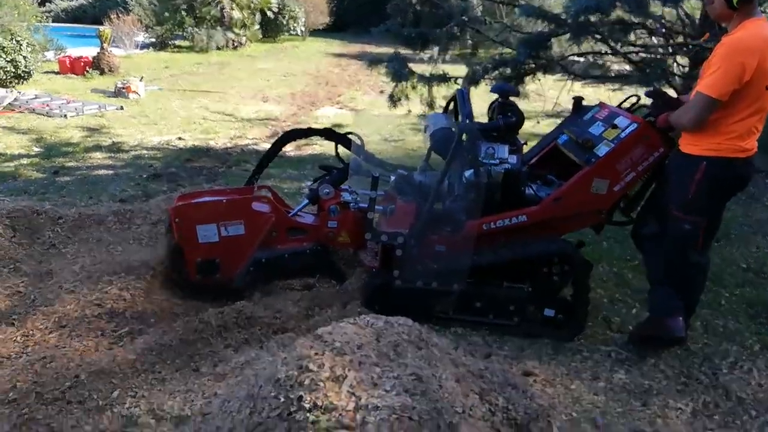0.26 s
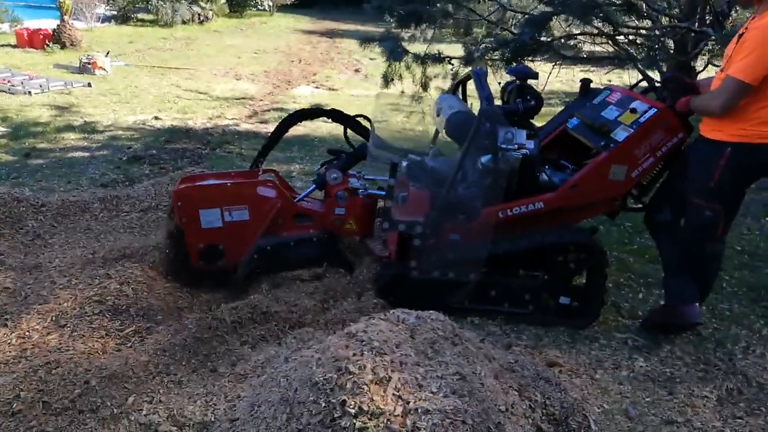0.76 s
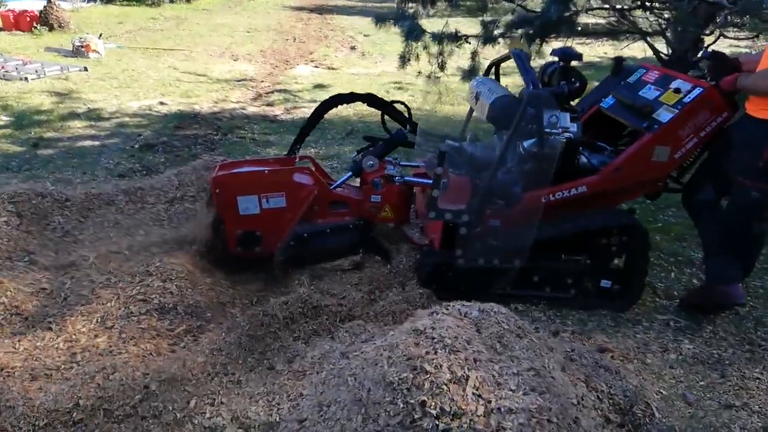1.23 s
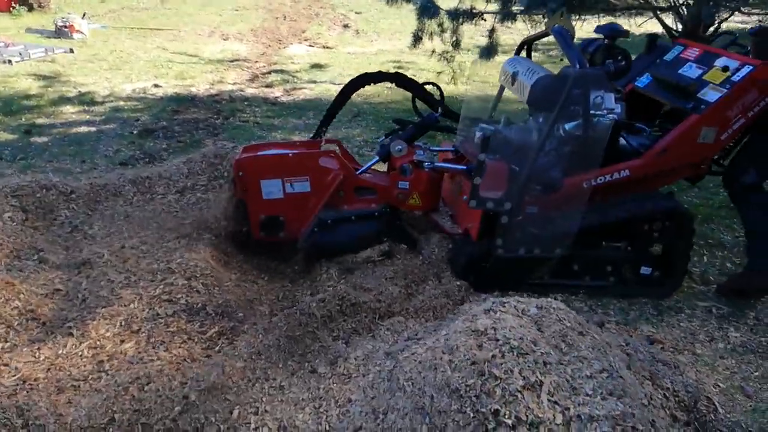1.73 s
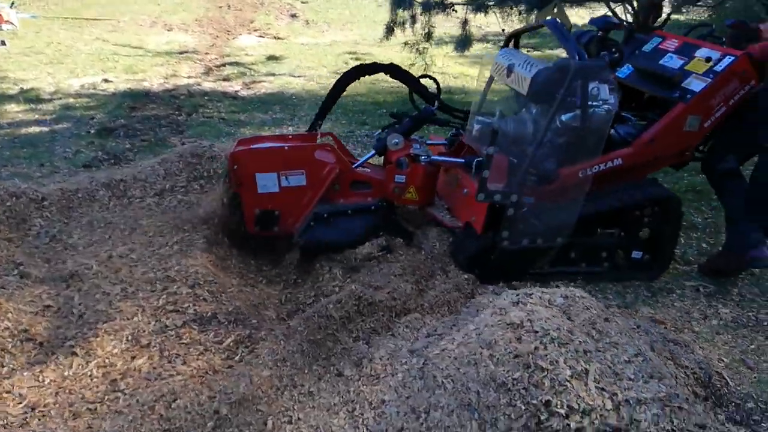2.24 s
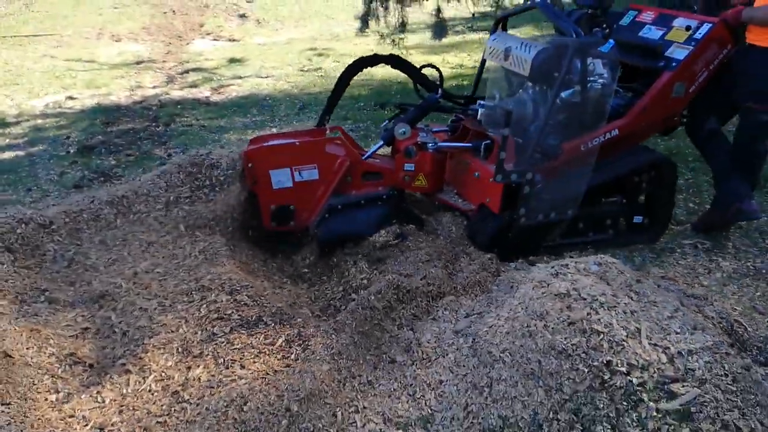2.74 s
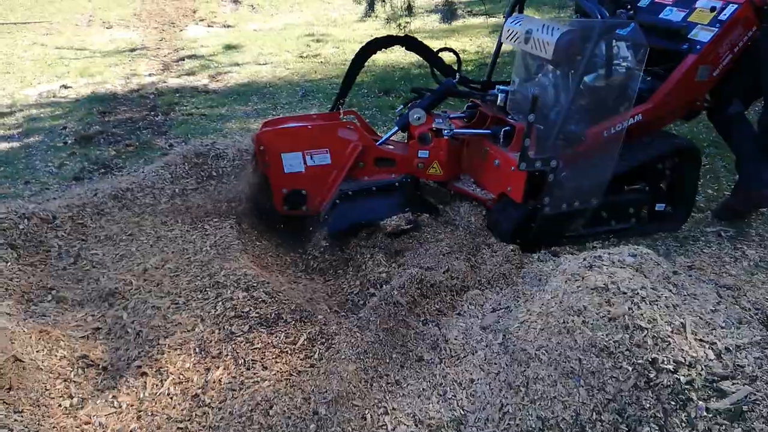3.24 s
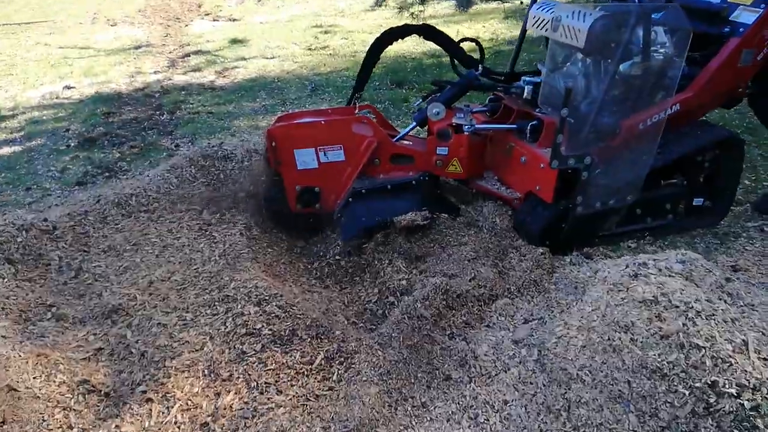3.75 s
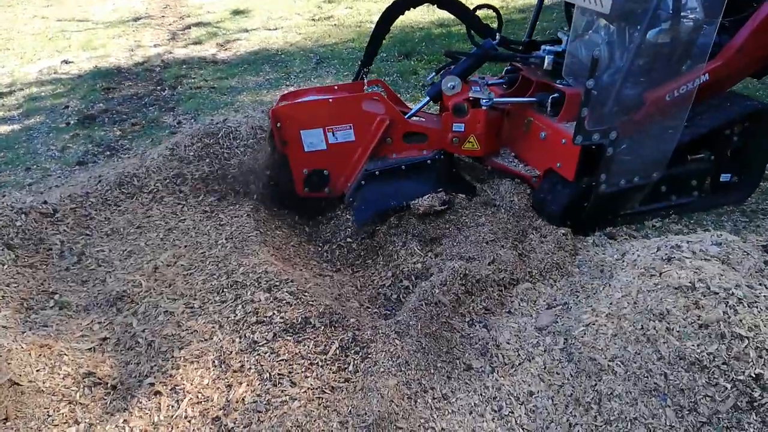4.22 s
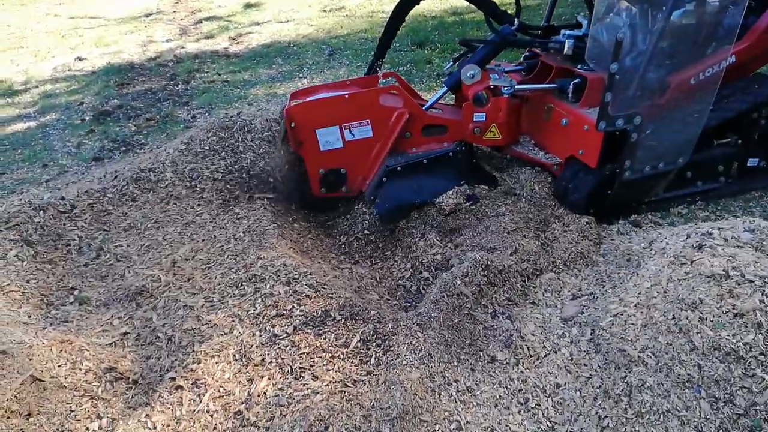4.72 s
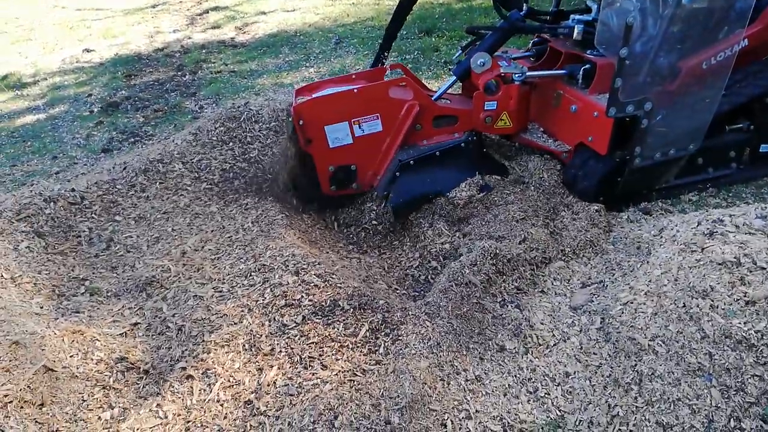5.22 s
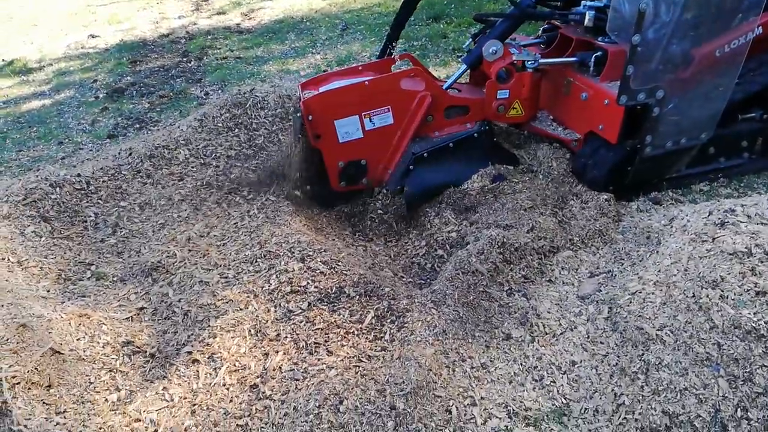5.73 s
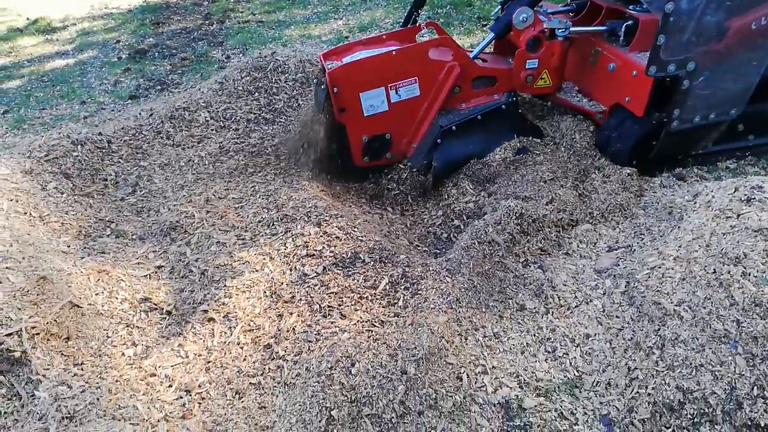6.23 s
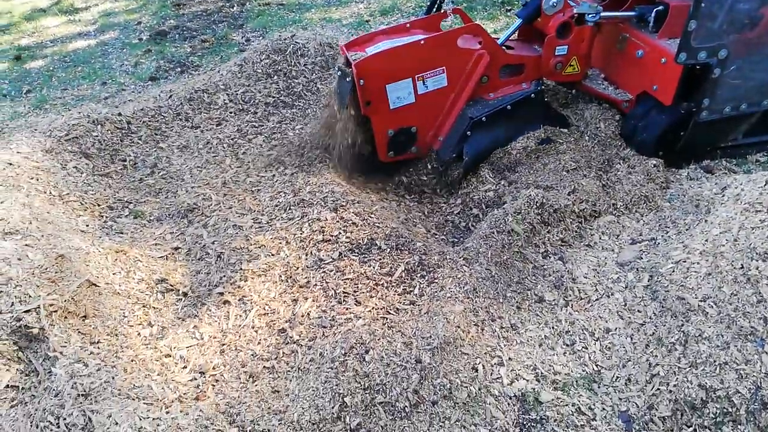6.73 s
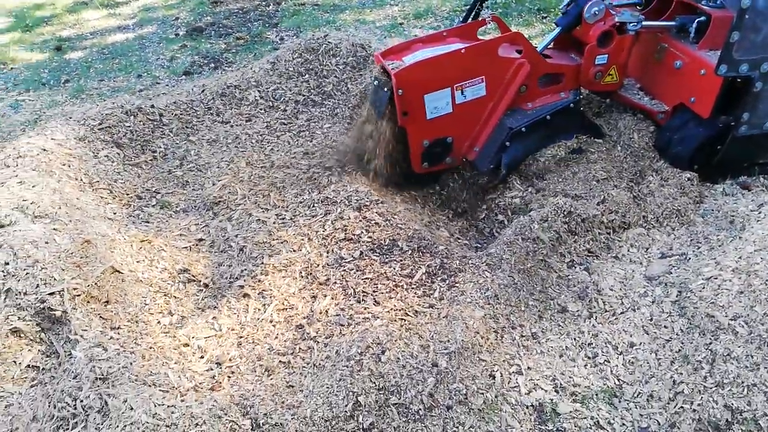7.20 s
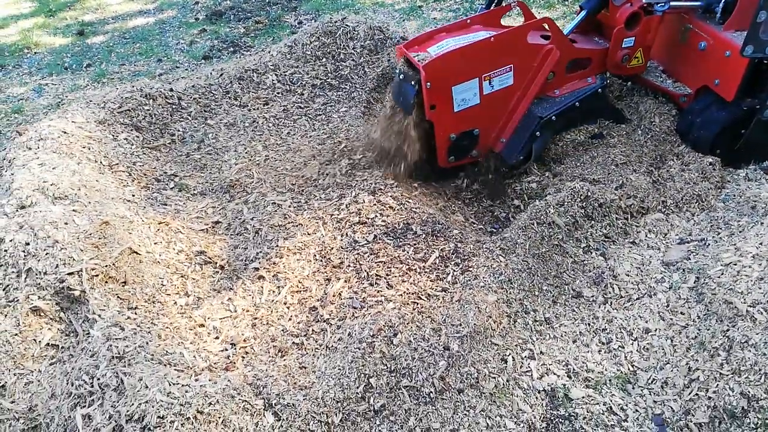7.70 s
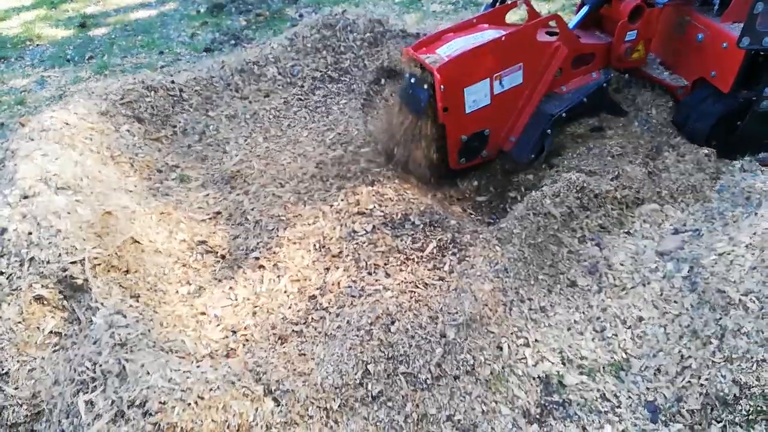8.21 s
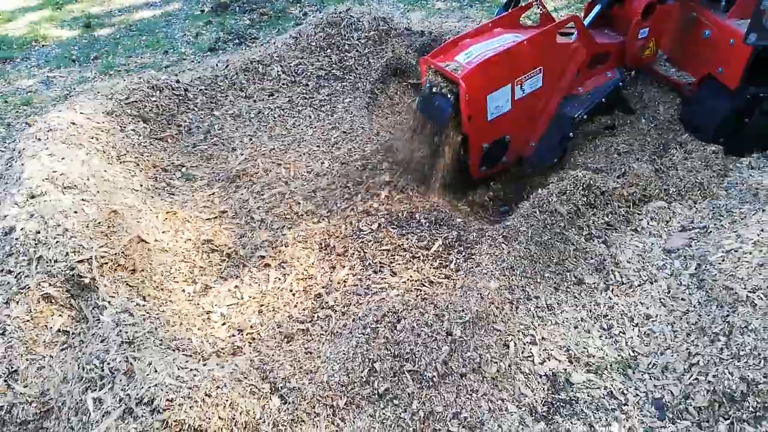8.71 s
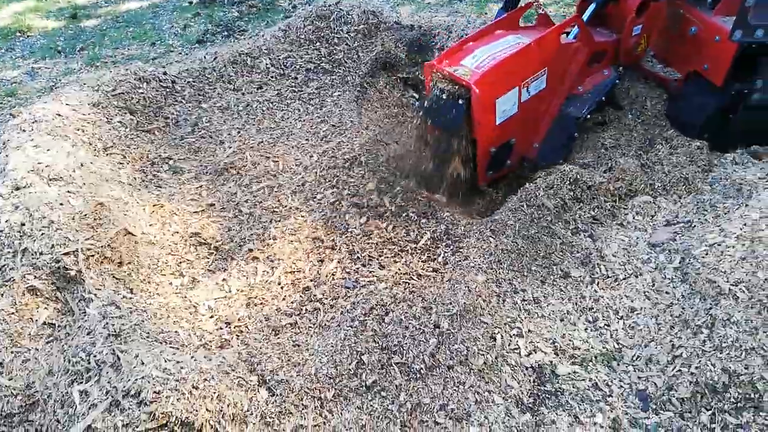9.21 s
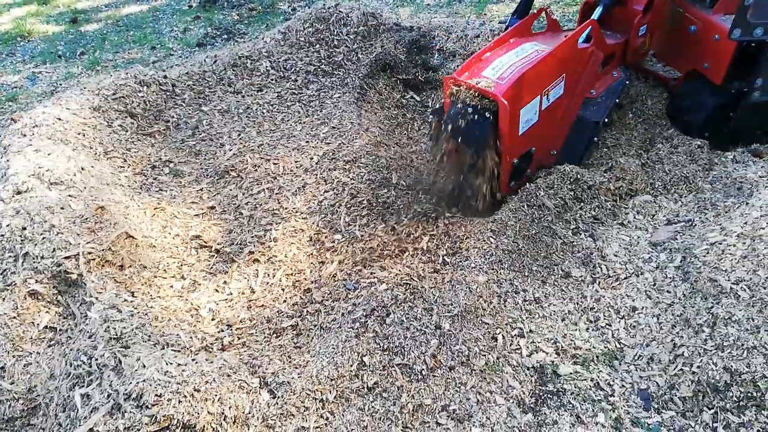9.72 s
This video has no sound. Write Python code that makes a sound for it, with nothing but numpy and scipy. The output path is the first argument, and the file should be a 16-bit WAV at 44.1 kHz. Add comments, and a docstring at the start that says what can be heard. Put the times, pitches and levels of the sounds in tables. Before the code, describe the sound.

A small petrol engine throbs steadily at high revs while a toothed wheel rasps wood into hissing chips, with sharp knocks and brief metallic pings.

```python
"""First one hears the throb of a V-twin petrol engine, while a stump grinder's teeth skim loose wood on a lawn.
A periodic line spectrum makes the exhaust, whose throttle follows a governor that hunts as the speed changes.
Filtered noise makes the rasp of the teeth, the splintering and the chips that hiss against the guard;
decaying bursts and tones make the hard knocks, and damped or sustained modes the ringing steel wheel.
The listener walks from beside the machine to the cutter, so the colours and the balance change."""
import sys
import numpy as np
from scipy import signal
from scipy.fft import rfft, irfft, next_fast_len
from scipy.io import wavfile
from scipy.ndimage import uniform_filter1d

SR = 44100
rng = np.random.default_rng(int(sys.argv[2]) if len(sys.argv) > 2 else 0)


def bounce(signal):
    """Save signal as a 16-bit WAV file at the path given by the first command-line argument."""
    frames = np.transpose(np.atleast_2d(signal))
    limited = np.clip(frames, -1, 1)
    pcm = np.round(limited * 32767).astype(np.int16)
    wavfile.write(sys.argv[1], SR, pcm)


N = 438794
TIME = np.arange(N) / SR
FREQS = np.maximum(np.fft.rfftfreq(next_fast_len(N), 1 / SR), 1)

# walk towards the cutter: (time [s], place [0 far, 1 halfway, 2 near])
WALK = [(0, 0.21), (2.4, 0.087), (4.4, 0.88), (6.9, 1.7), (9.95, 2.03)]
LEFT_LAG_S = 0.00046  # low sounds reach the right side first

# crankshaft speed: (time [s], speed [rpm])
CRANK_SPEED = [(0.0, 3505), (0.88, 3493), (2.21, 3528), (2.75, 3465), (3.09, 3509), (3.81, 3354),
               (4.06, 3603), (4.44, 3485), (5.14, 3494), (5.41, 3426), (5.67, 3560), (6.4, 3371),
               (7.33, 3490), (7.88, 3433), (8.0, 3495), (8.78, 3421), (9.3, 3531), (9.95, 3475)]
# firing moments of the two cylinders: (first [share of a cycle], second [share of a cycle])
FIRINGS = (.487, .858)
WEAK_PUFF_DB = -3.5  # first puff of a cycle beside the second
# silencer resonances: (frequency [Hz], width [Hz])
SILENCER_MODES = [(68, 32), (160, 83)]
# exhaust lines beside the engine, relative within each voice: (multiple of the cycle rate, level [dB])
EXHAUST_FAR = [(1, -17), (2, -2), (3, -3), (4, -11), (5, 2.5), (6, 1.5), (7, -14), (8, -7.5), (9, -6),
               (10, -7.5), (11, -12), (12, -12), (13, -16.5), (14, -21), (15, -53), (16, -23)]
# exhaust lines close to the cutter, relative within each voice: (multiple of the cycle rate, level [dB])
EXHAUST_NEAR = [(1, -15), (2, -1), (3, 0), (4, -12), (5, 0.5), (6, 2), (7, -15.5), (8, -8.5), (9, -17),
                (10, -23.5), (11, -45.5), (12, -49), (13, -34), (14, -19.5), (15, -53), (16, -18)]
# throb, boom, bark and rasp of the exhaust:
# (level at light load [dB], added at full throttle [dB], added per place walked [dB])
EXHAUST_VOICES = [(-27.5, 3, 0.6), (-27.5, 6.5, 1.2), (-19.9, -3, -0.2), (-33, -2.5, 2)]
# brief dips of the exhaust's level: (time [s], length [s], depth [dB])
EXHAUST_DIPS = [(2.65, 0.19, 4), (2.92, 0.26, 6.5), (3.3, 0.42, 1.5), (5.1, 0.081, 3.5), (7.74, 0.079, 3),
                (7.922, 0.59, 2.5), (9.248, 0.2, 2)]
DIP_ATTACK_S, DIP_RELEASE_S = 0.044, 0.1
# moments when the exhaust turns raspier: (time [s], length [s], added level [dB])
EXHAUST_FLARES = [(1.55, 0.71, 3.3), (5.45, 0.38, 0.5)]
FLARE_RAMP_S = 0.29
# speed at half throttle, scale of the response to sag, reaction lag, and span over which the throttle is smoothed
GOVERNOR_RPM, GOVERNOR_SPAN_RPM, GOVERNOR_LAG_S, GOVERNOR_TRAVEL_S = 3456, 24.2, 0.12, 0.38

# whines of fan and valve gear, before wavering and panning:
# (multiple of the cycle rate, level at the far place [dB], level from halfway on [dB])
WHINES = [(24, -37, -38), (26, -37, -41), (28, -43, -47), (30, -43, -47), (32, -42, -43), (36, -42, -43),
          (40, -44, -43), (48, -42, -41)]
# the fan's blade note, the lowest whine, is strongest where the walk passes its intake
FAN_PLACE, FAN_WIDTH_PLACES, FAN_GAIN_DB, FAN_AWAY_DB = 0.78, 0.28, 9, -1.5

BELT_RATIO = 1.226  # turns of the wheel per engine cycle, before slip
# modes of wheel and guard, relative: (frequency [Hz], level [dB], decay by 60 dB [s])
WHEEL_MODES = [(1170, 10, 0.12), (1660, 15, .05), (1830, 3.5, 0.19), (1990, 11, 0.14), (2310, 15, 0.052)]
# rubs that make one wheel mode sing, before wavering and panning:
# (time [s], length [s], level [dB], frequency [Hz])
RUBS = [(1.58, 0.62, -39.5, 2000), (3.476, 0.06, -27.5, 2005), (6.195, 0.11, -29.5, 1856),
        (6.399, 0.1, -29.5, 1844), (6.56, 0.42, -36.5, 1856), (7.065, 0.09, -26.5, 1856),
        (7.3, 0.36, -34.5, 1841), (7.95, 0.2, -34.5, 1870), (8.593, 0.21, -28, 1853),
        (8.886, 0.088, -35, 1865), (9.102, 0.39, -36, 1850), (9.576, 0.1, -30, 1856),
        (9.808, 0.1, -30.5, 1846)]
RUB_ATTACK_S, RUB_RELEASE_S = 0.034, 0.062
# a tooth catches and pings the wheel, before panning: (time [s], peak level [dB])
PINGS = [(5.04, -20), (5.0969, -21), (5.1513, -16.5), (5.2096, -27), (5.3753, -18), (5.6017, -20),
         (5.6571, -27), (5.7115, -27), (5.7629, -22), (5.8177, -13.5)]
# fainter pings on every second turn: peak while no bite, added at full bite, spread
CHATTER_DB, CHATTER_BITE_DB, CHATTER_SPREAD_DB = -40, 21, 7.5
# bright modes of the skidding teeth, relative: (frequency [Hz], level [dB], decay by 60 dB [s])
SKID_MODES = [(3570, -2, 0.027), (3940, 0, 0.018), (4380, 0, .015), (7180, 6, .008)]
# the teeth skid over a hard spot
SKID_S, SKID_LENGTH_S, SKID_ATTACK_S, SKID_RELEASE_S, SKID_DB = 5.02, 0.084, 0.053, 0.28, -24

# runs of hard knocks, one per turn of the wheel; levels relative, pitch of the first knock:
# (time [s], length [s], first peak level [dB], pitch [Hz], first spray level [dB])
KNOCKS = [(1.342, 0.01, -12, 2360, -31), (2.673, 0.01, -9, 1990, -13), (2.727, 0.01, -17, 2000, -18),
          (2.784, 0.01, -9.5, 1990, -15), (2.924, 0.04, -0.5, 2200, -17), (2.981, 0.01, -20, 2290, -17),
          (3.008, 0.01, -11, 1990, -11), (3.036, 0.1, -6.5, 2200, -11), (3.148, 0.01, -14, 1990, -10),
          (3.374, 0.01, -4, 4370, -11.5), (3.472, 0.01, -10, 1990, -16), (3.513, 0.01, -7, 1990, -25),
          (3.628, 0.01, -4.5, 4264, -15), (3.725, 0.04, -11, 2980, -17), (3.815, 0.01, -16, 1550, -19),
          (3.874, 0.01, -16, 2100, -19), (3.985, 0.01, -12, 1410, -20), (6.005, 0.13, -8.5, 1020, -13.5),
          (6.149, 0.1, -12, 960, -19), (6.765, 0.01, -7, 1920, -15), (7.768, 0.01, -20, 1380, -8.5),
          (7.982, 0.01, 0, 3200, -33), (8.011, 0.01, -6.5, 1580, -25), (8.039, 0.04, -7.5, 1900, -29),
          (9.402, 0.01, -7, 1170, -29), (9.812, 0.01, -10, 1170, -30)]
KNOCK_LOSS_DB = 0.9  # from one turn to the next within a run
TOCK_CYCLES, TOCK_SCATTER = 5.1, 0.13  # decay constant in cycles; largest share of pitch scatter along a run

# rasp, splintering and spray while skimming loose wood, relative: (level [dB], added per place walked [dB])
SKIMMING = [(-28.5, 0.14), (-33.5, 0.6), (-28, 0.68)]
SKIMMING_BITE = 0.16  # share of the cutting power that comes as one knock per turn
# digs into the stump: (time [s], length [s], rasp added [dB], splintering added [dB], spray added [dB],
# bite added [0-1])
CUTS = [(0.501, 0.73, -0.5, -1, 1.6, 0), (2.469, 0.75, -0.5, 2.5, 0, 0.42), (3.31, 0.42, 2.5, 1.5, 0, 0.18),
        (3.681, 0.33, 6.5, 6, 3, 0.53), (4.255, 0.23, 2, 2, 0.5, 0.19), (4.697, 0.34, 1, 2.5, 2.5, 0.29),
        (4.997, 0.41, 3.5, 5, 2, 0.1), (5.549, 0.35, 3.5, 3, 0.8, 0.33), (6.08, 1, 3.5, 3.5, 1.5, 0.07),
        (7.06, 0.65, 1.5, 2, 1.5, 0.12), (7.915, 0.32, 0.5, 3.5, 1.5, 0.33), (8.546, 0.65, 2, 1.5, 2, 0.14),
        (9.2, 0.65, 2, 0.6, 1.3, 0)]
CUT_ATTACK_S, CUT_RELEASE_S = 0.14, 0.092
# colour of the teeth in wood, also given to the engine clatter: (frequency [Hz], left [dB], right [dB])
WOOD_COLOUR = [(213, 7, -5.5), (313, -11.5, -5.5), (410, -15.5, -6), (604, -12, -3), (796, -14, 1.5),
               (1060, -10, -2), (1460, -1, -1.5), (1690, -7, -5.5), (2000, -10, -0.5), (2280, -8, -9),
               (2370, -40, -10)]
# colour of the flying chips from beside the machine: (frequency [Hz], left [dB], right [dB])
CHIPS_FAR = [(2620, 1.5, 8.5), (3250, 0.5, -7.5), (3900, -3.5, 3.5), (4720, -0.5, 3.5), (5700, -13.5, -4),
             (7040, -11, -21), (8130, -5.5, -9.5), (9440, -12, 1.5), (11600, -16.5, -4), (12300, -19, -5),
             (14200, -24, -10), (15800, -30, -21)]
# colour of the flying chips from halfway: (frequency [Hz], left [dB], right [dB])
CHIPS_HALFWAY = [(2400, -14, 3), (2800, -10.5, -13.5), (3570, 1, 0.5), (4300, -6.5, 4.5), (4680, 4.5, 0),
                 (5800, -15.5, -13.5), (7350, -1.5, -0.5), (9000, -11, -2.5), (10400, -13, -5.5),
                 (12000, -21, -4), (15800, -32, -21)]
# colour of the flying chips from close to the cutter: (frequency [Hz], left [dB], right [dB])
CHIPS_NEAR = [(2500, -7.5, -19), (3090, 7.5, -1.5), (3920, -5.5, -5.5), (4920, -15.5, 4.5),
              (5540, -8, -5.5), (7200, -10.5, -6), (8700, -11, 3), (9200, 3.5, -10.5), (11060, -19, 6),
              (12040, -18, 1), (14000, -18, -9.5), (15800, -40, -13)]

CUTOFF_HZ = 15800  # top of the sound's range


def from_db(db):
    """Level to amplitude: 20 dB is a factor of ten."""
    return np.exp(np.asarray(db) * (np.log(10) / 20))


def rms_one(x):
    """Normalisation: scale the effective value to 1."""
    return x / np.sqrt(np.mean(x ** 2) + 1e-20)


def in_time(rows):
    """Linear interpolation: one value per sample for each column of a curve."""
    s, *columns = np.transpose(rows)
    return [np.interp(TIME, s, column) for column in columns]


def drift(rate):
    """Slow random fluctuation: chance values, so many per second, joined by lines; rms 1."""
    return rms_one(np.interp(TIME * rate, np.arange(4000), rng.standard_normal(4000)))


def swell(start, length, attack, release):
    """Trapezoidal envelope of height 1: rises, holds until its length is over, falls."""
    rise = (TIME - start) / attack
    fall = 1 - (TIME - start - length) / release
    return np.clip(np.minimum(rise, fall), 0, 1)


def band(x, low_hz, high_hz, order=2):
    """Band limitation by a Butterworth filter."""
    edges = [low_hz, min(high_hz, .45 * SR)]
    return signal.sosfilt(signal.butter(order, edges, "band", fs=SR, output="sos"), x + 1e-18)


def ring(x, hz, t60):
    """Damped resonance: a unit click sets a decaying sine of initial height 1 ringing."""
    r = from_db(-60 / (t60 * SR))
    w = 2 * np.pi * hz / SR
    return signal.lfilter([0, np.sin(w)], [1, -2 * r * np.cos(w), r * r], x + 1e-18)


def coloured(x, colour, low_hz, high_hz, ripple_db=5.0):
    """Spectral colouring: each side has its own curve, steep edges and reflection ripple; overall rms 1."""
    hz, *sides = np.transpose(colour)
    curves = np.array([np.interp(np.log(FREQS), np.log(hz), side) for side in sides])
    # reflections from ground and guard, drawn as chance ripple with a node every 65 Hz
    ripple = np.array([np.interp(FREQS, np.arange(400) * 65, rng.standard_normal(400)) for side in sides])
    gain = from_db(curves + ripple_db * ripple * FREQS / (FREQS + 1500))
    edges = 1 / np.sqrt((1 + (low_hz / FREQS) ** 16) * (1 + (FREQS / high_hz) ** 16))
    size = next_fast_len(N)
    return rms_one(irfft(rfft(x, size) * gain * edges, size)[:, :N])


def stereo_noise(alike):
    """Partial coherence: white noise of which this share of the power is common to both sides."""
    alike = np.clip(alike, 0, 1)
    return np.sqrt(alike) * rng.standard_normal(N) + np.sqrt(1 - alike) * rng.standard_normal((2, N))


def grains(per_s, spread_db, grain_hz):
    """Random impact process: the envelope of a hail of tiny, uneven impacts; rms 1."""
    sizes = from_db(spread_db * np.minimum(rng.exponential(1, N), 3.3))
    clicks = (rng.random(N) < per_s / SR) * sizes
    power = signal.lfilter([1], [1, -np.exp(-2 * np.pi * grain_hz / SR)], clicks ** 2 + 1e-18)
    return rms_one(np.sqrt(power))


def left_late(x):
    """Interaural delay: the sound reaches the right side first."""
    return np.array([np.interp(TIME - LEFT_LAG_S, TIME, x), x])


def looped(cycle, orders, heights):
    """Fourier synthesis: one period, built from complex line heights, plays at the engine's pace."""
    turn = np.linspace(0, 1, 4097)
    period = np.real(heights @ np.exp(2j * np.pi * np.outer(orders, turn)))
    return np.interp(cycle % 1, turn, period)


def rumble():
    """Band-limited noise: a soft low rumble, almost alike on both sides."""
    return from_db(-37.5) * rms_one(band(stereo_noise(0.98), 44, 213))


def throttle():
    """Feedback control: the governor opens the throttle (0-1) around a lag after the speed sags."""
    rpm = np.interp(TIME - GOVERNOR_LAG_S, *np.transpose(CRANK_SPEED))
    opening = 1 / (1 + np.exp((rpm - GOVERNOR_RPM) / GOVERNOR_SPAN_RPM))
    return uniform_filter1d(opening, round(GOVERNOR_TRAVEL_S * SR))


def exhaust(cycle, place, table):
    """Harmonic excitation: uneven puffs and silencer set the phases; an open throttle trades bark for boom."""
    orders, level_db = np.transpose(table)
    hz = orders * cycle[-1] / TIME[-1]
    puffs = sum(from_db(db) * np.exp(-2j * np.pi * orders * at) for at, db in zip(FIRINGS, (WEAK_PUFF_DB, 0)))
    silencer = sum(1 / (1 + 1j * (hz ** 2 - f ** 2) / (hz * width)) for f, width in SILENCER_MODES)
    lines = from_db(level_db) * np.exp(1j * np.angle(puffs * silencer))
    group = np.digitize(orders, (2.5, 3.5, 7.5))  # one group of lines per voice
    load = throttle()
    voices = []
    for k, (db, load_db, walk_db) in enumerate(EXHAUST_VOICES):
        voice = rms_one(looped(cycle, orders, lines * (group == k)))
        voices.append(voice * from_db(db + load_db * load + walk_db * place))
    throb, boom, bark, rasp = voices
    flare_db = sum(db * swell(s, length, FLARE_RAMP_S, FLARE_RAMP_S) for s, length, db in EXHAUST_FLARES)
    # no two firings burn alike, which shows most in the upper lines
    return throb + (boom + bark) * from_db(0.25 * drift(58)) + rasp * from_db(flare_db + 1.27 * drift(70))


def exhaust_heard(cycle, place):
    """Arrival-time difference: the exhaust is right first; its colour follows the walk and its level dips."""
    near = np.clip(place - .3, 0, 1)
    puffs = (1 - near) * exhaust(cycle, place, EXHAUST_FAR) + near * exhaust(cycle, place, EXHAUST_NEAR)
    dip_db = sum(db * swell(s, length, DIP_ATTACK_S, DIP_RELEASE_S) for s, length, db in EXHAUST_DIPS)
    return left_late(puffs * from_db(-dip_db))


def engine_clatter(cycle, place):
    """Cyclic repetition: valve gear and fan give a thicket of weak lines and a few wavering whines."""
    shaky = cycle + 0.001 * drift(17)
    orders = np.setdiff1d(np.arange(15, 90), np.array(WHINES)[:, 0])
    # parts on the crankshaft turn twice per cycle, so the even lines are the stronger
    heights = from_db(-5 * (orders % 2)) * np.exp(2j * np.pi * rng.random((2, len(orders))))
    thicket = coloured(np.array([looped(shaky, orders, h) for h in heights]), WOOD_COLOUR, 440, 2650)
    fan_db = FAN_AWAY_DB + FAN_GAIN_DB / (1 + ((place - FAN_PLACE) / FAN_WIDTH_PLACES) ** 2)
    whines = 0
    for k, (order, far_db, near_db) in enumerate(WHINES):
        angle = 2 * np.pi * (order * shaky + rng.random())
        waver_db = 0.91 * drift(4) + 2.9 * drift(30)
        level_db = np.interp(place, [0, 1], [far_db, near_db]) + waver_db + (k == 0) * fan_db
        whines = whines + np.sqrt(2) * from_db(level_db) * np.sin([angle - 1.4, angle])
    # the clatter swells at each valve beat, six times per cycle
    beat = rms_one(1 + .5 * np.cos(12 * np.pi * cycle))
    return from_db(-33.0) * beat * thicket + whines * from_db([[-6], [3]])


def wheel_turns(cycle):
    """Belt drive with slip: the leading tooth meets the wood at whole turns."""
    turns = BELT_RATIO * cycle
    at = np.sort([row[0] for row in [*KNOCKS, *PINGS]])
    slip = np.unwrap(2 * np.pi * np.interp(at, TIME, turns)) / (2 * np.pi)
    return turns - np.interp(TIME, at, slip)


def tooth_pulses(turns, decay, uneven_db):
    """Periodic impulse: on each turn a sudden bite of its own strength dies away; rms 1."""
    strength = from_db(uneven_db * np.minimum(rng.standard_normal(2000), 1))
    phase = turns % 1
    onset = np.minimum(phase / 0.046, 1)
    return rms_one(strength[np.floor(turns).astype(int)] * np.exp(-phase / decay) * onset)


def cut_levels(place):
    """Superposed loads: rasp, splintering, spray (dB) and bite (0-1) of skimming, raised by each dig."""
    *added_db, bite = sum(np.outer(added, swell(s, length, CUT_ATTACK_S, CUT_RELEASE_S))
                          for s, length, *added in CUTS)
    levels = [db + walk_db * place + more for (db, walk_db), more in zip(SKIMMING, added_db)]
    return *levels, np.clip(SKIMMING_BITE + bite, 0, .9)


def wheel_song(width_hz, rough):
    """Sustained vibration: each rub keeps a narrow wheel mode sounding, wavering in pitch and strength."""
    waver = 0.97 * np.exp(0.6j * drift(15)) + rough * (drift(width_hz) + 1j * drift(width_hz))
    tones = sum(from_db(db) * swell(s, length, RUB_ATTACK_S, RUB_RELEASE_S) * np.exp(2j * np.pi * hz * TIME)
                for s, length, db, hz in RUBS)
    return np.sqrt(2) * np.real(waver * tones)


def pings(turns, place, hz, t60):
    """Impulse response: the head bounces, so a tooth rings the wheel every second turn, at times loudly."""
    s, db = np.transpose(PINGS)
    pairs = np.floor((turns - np.round(np.interp(s[-1], TIME, turns))) / 2)
    bite = cut_levels(place)[-1]
    chatter_db = CHATTER_DB + CHATTER_BITE_DB * bite + CHATTER_SPREAD_DB * drift(18)
    caught = (np.diff(pairs, prepend=pairs[0]) > 0) * from_db(chatter_db)
    caught[np.round(s * SR).astype(int)] = from_db(db)
    return ring(caught, hz, t60)


def skid(turns):
    """Modal excitation by friction: tooth passes ring a few bright modes whose balance keeps changing."""
    scrape = rng.standard_normal(N) * tooth_pulses(turns, decay=0.27, uneven_db=4.0)
    rings = sum(from_db(db + 2.7 * drift(30)) * rms_one(ring(scrape, hz, t60)) for hz, db, t60 in SKID_MODES)
    envelope = swell(SKID_S, SKID_LENGTH_S, SKID_ATTACK_S, SKID_RELEASE_S)
    return from_db(SKID_DB) * envelope * rms_one(rings)


def single_knocks(turns):
    """Rotational timing: a run knocks once per turn, ever weaker (time s, peak dB, pitch Hz, spray dB)."""
    for start, length, peak_db, hz, spray_db in KNOCKS:
        first, last = np.interp([start, start + length], TIME, turns)
        for k in range(int(last - first) + 1):
            pitch = hz * (1 + TOCK_SCATTER * rng.uniform(-0.7, 1) * (k > 0))
            loss_db = KNOCK_LOSS_DB * k
            yield np.interp(first + k, turns, TIME), peak_db - loss_db, pitch, spray_db - loss_db


def knocks(turns):
    """Impact: a tooth in hard wood gives a short crack, a hollow tock, a spit of chips and a wheel ring."""
    crack, spit = np.zeros((2, 2, N))
    age = np.arange(SR // 25) / SR
    for s, peak_db, hz, spray_db in single_knocks(turns):
        start = round(s * SR)
        at = slice(start, start + len(age))
        noise = rng.standard_normal((3, len(age)))
        burst = (noise[:2] + noise[2]) * np.exp(-age / 0.0031)
        body = band(burst, hz * .62, hz * 1.6, order=1)
        # the wood rings for a few cycles, so low knocks last longer
        tock = np.sin(2 * np.pi * hz * age) * np.exp(-age * hz / TOCK_CYCLES)
        crack[:, at] += from_db(peak_db) * (0.53 * body / np.abs(body).max() + 0.41 * tock)
        spit[:, at] += from_db(spray_db + 2.5) * burst
    steel = sum(from_db(db - 51.5) * ring(crack, hz, t60) for hz, db, t60 in WHEEL_MODES)
    return crack + steel + band(spit, 5900, 11000)


def cutting(turns, place):
    """Modulated fracture noise: teeth rasp, splinters crack off and chips are flung out twice per turn."""
    rasp_db, splinter_db, spray_db, bite = cut_levels(place)
    fling = rms_one(1 + 0.16 * np.cos(4 * np.pi * turns - 1.2))
    knock = tooth_pulses(turns, decay=0.22, uneven_db=6.0)
    force = np.sqrt((1 - bite) * fling ** 2 + bite * knock ** 2)
    wood = stereo_noise(0.23) * (0.45 + 0.46 * force) * grains(1800, 2.5, 163)
    out = from_db(rasp_db) * coloured(wood, WOOD_COLOUR, 507, 3120)
    # the low growl of the wood gains strength towards the cutter
    out += from_db(rasp_db - 15.5 + 4.2 * place) * coloured(left_late(wood[1]), WOOD_COLOUR, 199, 582)
    cracks = stereo_noise(0.041) * force * grains(2800, 2.7, 115)
    hail = stereo_noise(.03) * (.6 * force + .4 * fling) * grains(5000, 2.8, 450)
    # cross-fade the three colours of the chips along the walk
    for k, colour in enumerate((CHIPS_FAR, CHIPS_HALFWAY, CHIPS_NEAR)):
        splinters = from_db(splinter_db + 1.5) * coloured(cracks, colour, 2380, 6640)
        spray = from_db(spray_db + 1.0) * coloured(hail, colour, 5630, 18000)
        out += np.sqrt(np.clip(1 - np.abs(place - k), 0, 1)) * (splinters + spray)
    return out


def scene():
    """Superposition: engine and cutter add, with the wheel's song and pings a little to the right."""
    cycle = np.cumsum(in_time(CRANK_SPEED)[0]) / (120 * SR)  # a four-stroke cycle takes two crank turns
    turns = wheel_turns(cycle)
    place = np.clip(in_time(WALK)[0], 0, 2)
    engine = rumble() + exhaust_heard(cycle, place) + engine_clatter(cycle, place)
    steel = wheel_song(width_hz=60, rough=0.37) + pings(turns, place, hz=2280, t60=0.05)
    cutter = steel * from_db([[-1.5], [1.5]]) + skid(turns) + knocks(turns) + cutting(turns, place)
    return engine + cutter


def record(dry):
    """Amplitude and band limitation: the highest peaks are clipped, then the top is cut steeply."""
    low_pass = signal.ellip(12, .1, 90, CUTOFF_HZ, fs=SR, output="sos")
    return signal.sosfilt(low_pass, np.clip(dry, -1, 1))


dry = scene()
out = record(dry)
bounce(out)
```